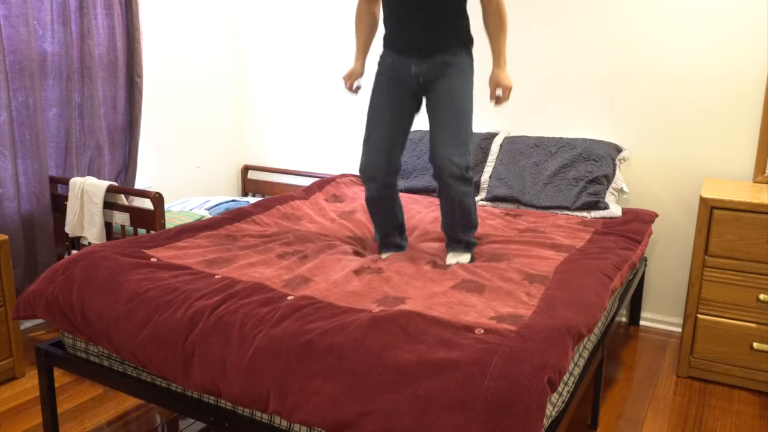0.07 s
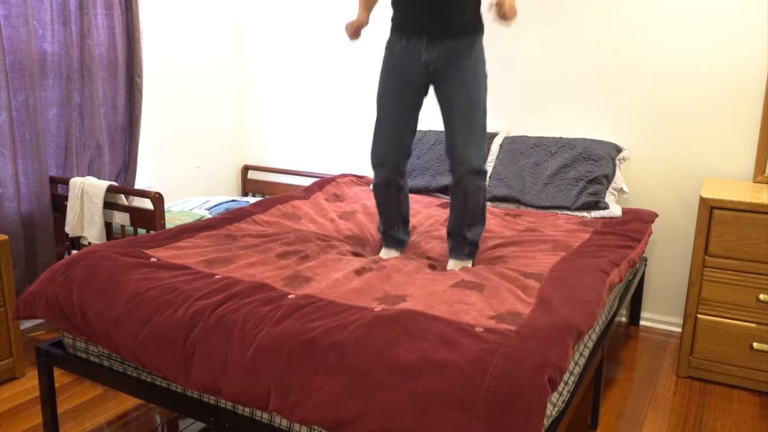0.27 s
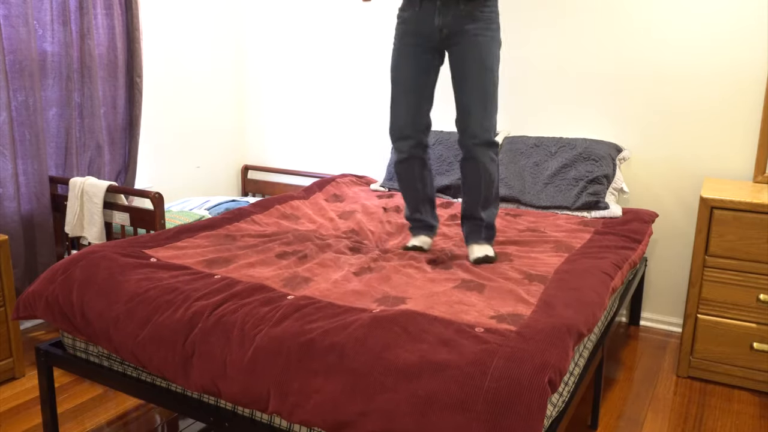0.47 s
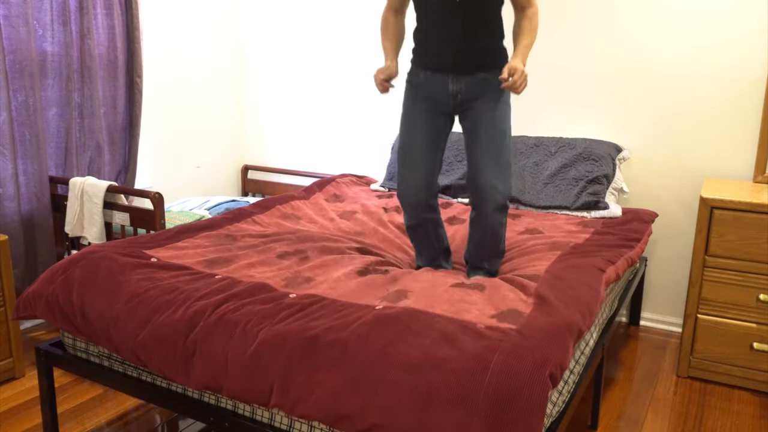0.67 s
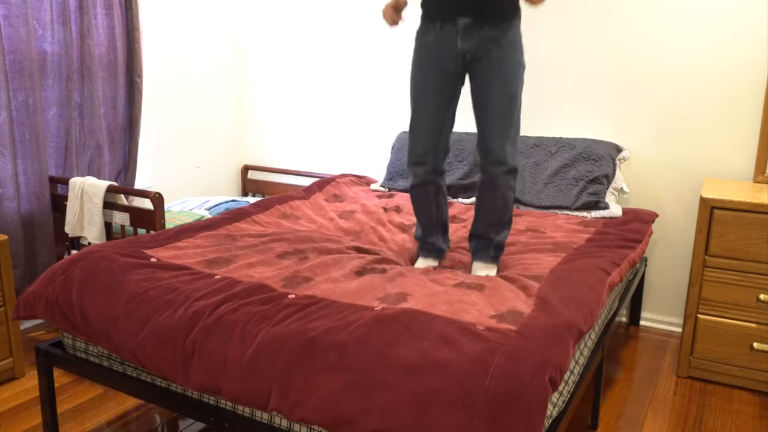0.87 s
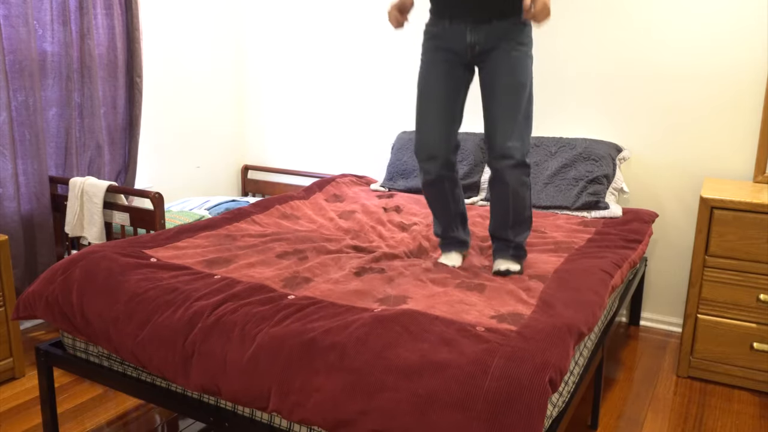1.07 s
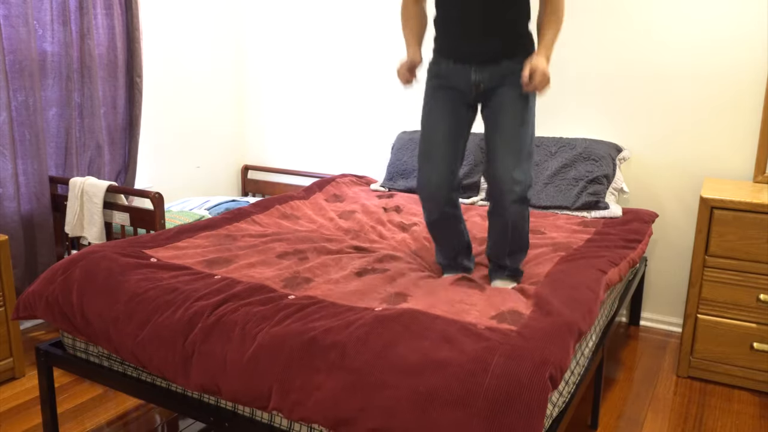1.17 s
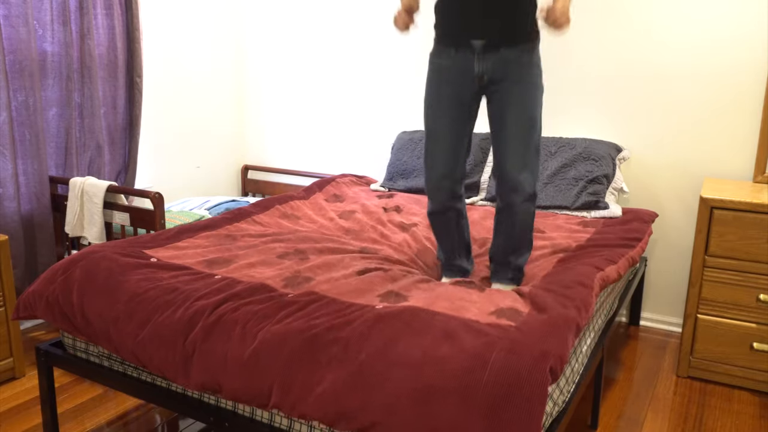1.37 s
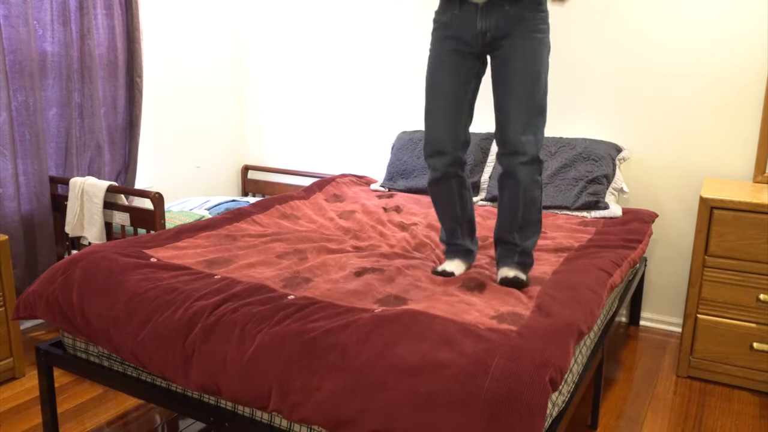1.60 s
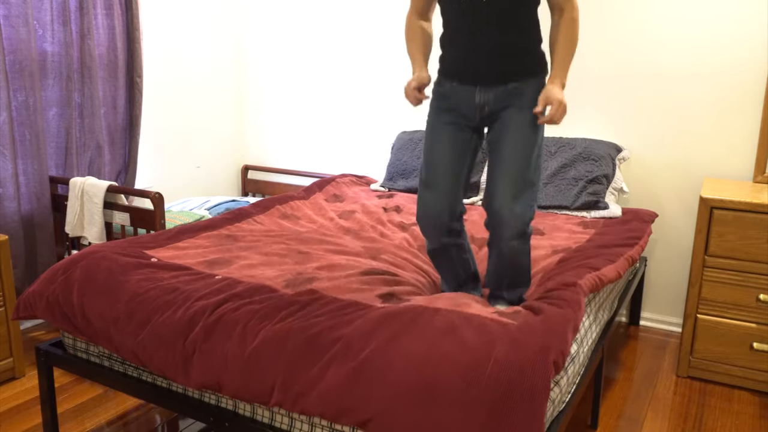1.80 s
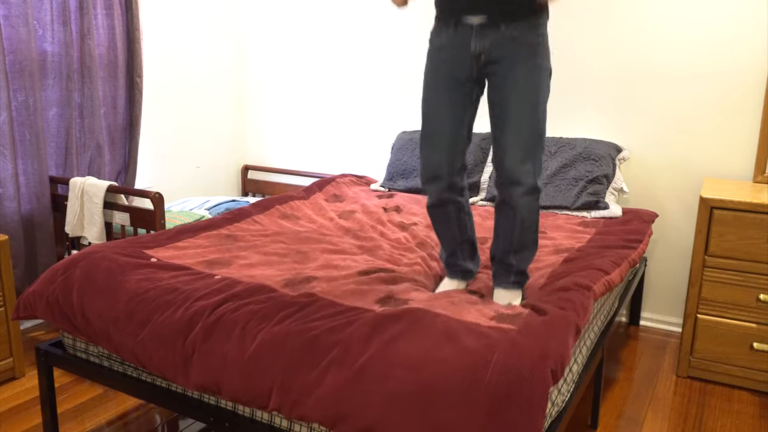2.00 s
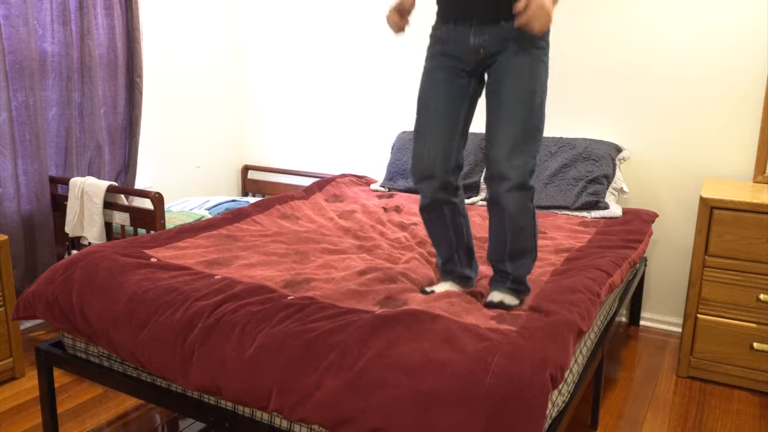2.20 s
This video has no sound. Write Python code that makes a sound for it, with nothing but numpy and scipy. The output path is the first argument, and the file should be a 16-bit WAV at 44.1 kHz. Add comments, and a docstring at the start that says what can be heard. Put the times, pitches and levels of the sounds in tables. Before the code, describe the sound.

A metal bed frame gives one loud, chattering knock at about 0.25 seconds, ringing for under half a second in a small bedroom. Much quieter bounces follow: a soft landing near 0.8 seconds, then deeper mattress thumps at about 1.4 and 1.95 seconds with light sock scuffs. Springs hum faintly near 0.7 and 1.8 seconds. Quilt and jeans rustle throughout over a low rumble and faint room hiss.

```python
"""A metal bed frame gives one loud, chattering knock as someone starts bouncing on the bed.
The first landing makes a joint slip, and the frame rings through a small wooden-floored bedroom.
Later bounces bring soft landings, a hum of springs, deep thumps and a rustle of quilt and jeans.
Loaded joints groan, socks scuff the quilt, and the swaying mattress rumbles over a faint room hiss."""
import sys
import numpy as np
from scipy.fft import rfft, irfft, next_fast_len
from scipy.io import wavfile
from scipy.ndimage import map_coordinates

SR = 44100
rng = np.random.default_rng(int(sys.argv[2]) if len(sys.argv) > 2 else 0)


def pcm_store(signal):
    """Save signal as 16-bit PCM."""
    levels = np.round(np.clip(np.atleast_2d(signal), -1, 1) * 32767)
    wavfile.write(sys.argv[1], SR, levels.astype(np.int16).T)


N = 99225

# The tone of each noisy sound. Each row: frequency in Hz, relative level in dB.
HISS_TONE = [(60, -12), (150, -7), (300, -5), (600, -8), (1200, -14), (1800, -11), (3000, -16), (8000, -21),
             (12000, -21.5)]
RUMBLE_TONE = [(15, -13), (30, -11.5), (48, 2), (70, -4), (105, -8), (150, -14), (220, -26), (500, -47)]
LANDING_TONE = [(30, -4), (60, 1), (150, 0), (245, -3), (380, -10), (550, -16), (900, -21.5), (2500, -34),
                (12000, -52)]
THUMP_TONE = [(25, -14), (50, -5), (90, -2), (150, 1), (220, -12.5), (380, -11.5), (600, -22), (1200, -32),
              (5000, -60)]
GROAN_TONE = [(60, -12), (200, -0.5), (300, -3.5), (400, -2), (540, -1.5), (720, -7.5), (1000, -21),
              (2000, -19), (3000, -34), (10000, -53)]
SWISH_TONE = [(60, -34), (150, 21.5), (210, 9.5), (320, 3.5), (500, 3.5), (1000, -0.5), (1900, -1.5),
              (3000, -4), (6000, -8), (10000, -11.5), (12000, -11.5)]
QUILT_TONE = [(260, -22), (450, -3), (919, -5.5), (1110, -2), (1280, -15), (1680, -1), (2840, -11),
              (5120, -12.5), (8400, -20.5), (9120, -16.5), (12000, -25.5), (15600, -58), (22000, -120)]
SCUFF_TONE = [(200, 3), (700, 0), (2000, -14), (3200, 9), (6000, -20), (9000, 1), (10500, -9)]
KNOCK_TONE = [(60, -20), (125, -3), (180, -7), (250, -14.5), (295, -9.5), (370, -14.5), (500, -1),
              (620, -9.5), (790, -15.5), (1020, -4), (1400, -9.5), (1750, -3.5), (2100, -4.5),
              (2450, -10.5), (3600, -13.5), (5600, -15.5), (6400, -24.5), (8500, -29.5), (11000, -31),
              (12000, -34)]
# Stereo width of the soft noises, and of the struck frame.
# Each row: frequency in Hz, level of the side signal against the middle in dB.
SOFT_WIDTH = [(60, -70), (110, -75), (200, -26.5), (360, -15), (640, -11.5), (1160, -8), (2100, -15.5),
              (3800, -10), (7000, -7), (12000, -9.5)]
FRAME_WIDTH = [(100, -60), (200, -43), (360, -31), (640, -18), (1160, -12), (2100, -14), (3800, -10),
               (7000, -5), (12000, -6)]
# The mattress swaying. Each row: time in seconds, relative rumble level in dB.
SWAY_LEVELS = [(0, -47.5), (.2, -39.5), (.3, -44), (.45, -46.5), (.68, -45.5), (.83, -40), (.92, -51.5),
               (1, -40.5), (1.16, -43.5), (1.22, -39), (1.47, -40.5), (1.68, -46), (1.82, -44), (2.25, -40)]
# Feet meeting or leaving the mattress, joints groaning, and fabric brushing.
# Each row: peak time in seconds, level in dB, rise in seconds, fall in seconds.
LANDINGS = [(0.159, -46.5, 0.055, .03), (.73, -45, 0.038, .05), (.805, -42, .015, 0.045),
            (1.0, -48.5, 0.023, 0.038), (1.228, -41.5, 0.035, 0.043), (1.54, -45.5, 0.013, 0.021),
            (1.595, -46.5, 0.011, 0.015), (1.8, -44.5, 0.07, 0.06)]
GROANS = [(.17, -50, 0.046, 0.075), (0.2265, -35.5, 0.0023, 0.034), (1.899, -41.5, 0.0046, 0.018),
          (1.95, -38, 0.0056, .02)]
SWISHES = [(.21, -46.5, 0.017, 0.15), (.93, -48.5, 0.062, 0.062), (1.019, -51, 0.014, 0.047),
           (1.27, -50.5, 0.079, 0.13), (1.535, -46, 0.051, 0.12), (1.84, -50, 0.031, 0.063),
           (2.05, -50.5, 0.035, 0.12), (2.189, -52, 0.073, 0.054)]
# The bottom of each bounce.
# Each row: peak time in seconds, thump level in dB, rustle level in dB, rise and fall in seconds.
BOUNCES = [(0.819, -43, -45.5, 0.047, 0.04), (1.378, -34.5, -42, 0.037, 0.045),
           (1.948, -34.5, -40.5, 0.036, 0.044)]
# Socks scuffing, and metal contacts in the knock. Each row: start in seconds, relative level in dB.
SCUFFS = [(1.346, -41), (1.893, -48.5)]
CONTACTS = [(0.2458, -19.5), (0.2486, -11.5), (0.2512, -13), (0.2546, -16), (0.256, -20), (0.2687, -16),
            (0.2785, -30), (0.2855, -20), (0.2975, -22)]
# The knock dying away in the room. Each row: frequency in Hz, seconds to fade by 60 dB.
ROOM_FADES = [(100, 0.48), (500, 0.47), (1000, 0.45), (1700, .5), (2800, 0.37), (5000, 0.37), (8000, 0.24),
              (12000, 0.25)]
# The frame's ringing notes. Each row: pitch in Hz, relative level in dB, seconds to fade by 60 dB.
FRAME_NOTES = [(151, -22, .38), (292, -26, .37), (450, -32, .4), (504, -24, .36), (522, -30, .25),
               (549, -31, .38), (958, -28, .34), (1023, -26, .32), (1075, -32, .36), (1234, -35, .45),
               (1556, -34, .44), (1602, -31, .53), (1699, -32, .48), (1775, -30, .43), (1835, -28, .42),
               (1975, -22, .33), (2018, -30, .33), (2106, -28, .35), (2147, -22, .34), (2176, -28, .33),
               (2338, -32, .34), (2933, -35, .3), (3334, -38, .33), (3781, -37, .33), (5648, -40, .33)]
# Springs under load. Each row: peak time in seconds, level in dB, pitch in Hz.
SPRING_HUMS = [(.72, -43, 283.3), (1.801, -40, 290.4)]
# The notes in one hum. Each row: multiple of the pitch, added level in dB.
SPRING_NOTES = [(0.999, -1), (1.13, -13), (1.388, -14.5)]
# Deep pushes on the bed base. Each row: start in seconds, level in dB, pitch in Hz.
PUSHES = [(1.197, -38, 55.4), (1.364, -26, 89), (1.944, -21, 89)]


def amp(db):
    """Turn decibels into a gain."""
    return 10 ** (np.asarray(db) / 20)


def unit(x):
    """Scale a signal to an average (rms) level of 1."""
    return x / np.sqrt(np.mean(x ** 2) + 1e-20)


def along(points, hz):
    """Read between a table's rows on a logarithmic frequency scale."""
    frequencies, values = np.transpose(points)
    return np.interp(np.log(hz + 1), np.log(frequencies + 1), values)


def since(start):
    """Seconds since start, for every sample."""
    return np.arange(N) / SR - start


def wobble(rate):
    """A smooth curve through `rate` random points a second."""
    points = rng.standard_normal(int(N * rate / SR) + 4)
    return map_coordinates(points, [np.arange(N) * rate / SR])


def filtered(x, response):
    """Give each frequency in x the gain that response(hz) asks for."""
    size = next_fast_len(N + SR // 4)
    gains = response(np.fft.rfftfreq(size, 1 / SR))
    return irfft(rfft(x, size) * gains, size)[..., :N]


def stereo(pair, tone, width):
    """Shape two unrelated signals into a middle and a side, then mix left and right."""
    mid, side = filtered(pair, lambda hz: amp([along(tone, hz), along(tone, hz) + along(width, hz)]))
    return np.array([mid + side, mid - side])


def noise(tone, grain_db=0):
    """Stereo noise with its bass in the middle; grain_db makes it grainy."""
    white = rng.standard_normal((2, N)) * amp(grain_db * wobble(rate=400))
    return unit(stereo(white, tone, SOFT_WIDTH))


def swell(peak, db, rise, fall):
    """A level that rises to a rounded top and falls again."""
    t = since(peak)
    distance = np.where(t < 0, t / rise, t / fall)
    return amp(db) * np.exp(.5 - np.hypot(.5, distance))


def build_up(start, rise):
    """A level that climbs from 0 towards 1."""
    return 1 - np.exp(-np.maximum(since(start), 0) / rise)


def decay(start, fade):
    """A level that jumps to 1, then drops 60 dB every `fade` seconds."""
    t = since(start)
    return (t >= 0) * amp(-60 * np.maximum(t, 0) / fade)


def room_hiss(db=-55.5):
    """The faint, steady background of the room."""
    return amp(db) * noise(HISS_TONE)


def mattress(sway_db=-1.5):
    """The mattress rumbles as it sways, thuds underfoot and thumps at the bottom of each bounce."""
    sway = amp(sway_db + np.interp(since(0), *np.transpose(SWAY_LEVELS)))
    landings = sum(swell(*row) for row in LANDINGS)
    thumps = sum(swell(peak, db, rise, fall) for peak, db, _, rise, fall in BOUNCES)
    return sway * noise(RUMBLE_TONE) + landings * noise(LANDING_TONE) + thumps * noise(THUMP_TONE)


def frame_groan():
    """Loaded joints rub with a low, grainy groan."""
    return sum(swell(*row) for row in GROANS) * noise(GROAN_TONE, grain_db=1)


def cloth(flutter_db=0.97):
    """Jeans and quilt brush between bounces; the quilt crumples and socks scuff it."""
    swishes = sum(swell(*row) for row in SWISHES) * noise(SWISH_TONE, grain_db=0.7)
    crumple_level = sum(swell(peak, db, rise, fall) for peak, _, db, rise, fall in BOUNCES)
    crumples = crumple_level * noise(QUILT_TONE, grain_db=1.0)
    scuff_level = sum(amp(db) * decay(start, fade=0.19) for start, db in SCUFFS)
    scuffs = scuff_level * noise(SCUFF_TONE, grain_db=2.0)
    return (swishes + crumples + scuffs) * amp(flutter_db * wobble(rate=44.46))


def metal_peaks(hz, spacing_hz=18, height_db=3.3, full_height_hz=3500):
    """Gains for the metal's many small resonances: random narrow peaks, gentler in the bass."""
    points = rng.standard_normal(int(SR / 2 / spacing_hz) + 2)
    peaks = map_coordinates(points, [hz / spacing_hz])
    return amp(height_db * peaks * np.minimum(hz / full_height_hz, 1))


def contact_burst(fade):
    """The combined level of the knock's contacts, whose energies add up."""
    return np.sqrt(sum((amp(db) * decay(start, fade)) ** 2 for start, db in CONTACTS))


def frame_knock(crack_db=0.5, room_db=-9.5):
    """A joint slips in a burst of cracks, and their ring dies away band by band in the room."""
    white = rng.standard_normal((2, N))
    metal = unit(filtered(rng.standard_normal((2, N)), metal_peaks))
    centres, fades = np.transpose(ROOM_FADES)
    tail = 0
    for share, fade in zip(np.eye(len(ROOM_FADES)), fades):  # share picks out one band
        band = filtered(metal, lambda hz: along(np.c_[centres, share], hz))
        tail = tail + contact_burst(fade) * band
    cracks = contact_burst(fade=0.0064) * white
    hit = amp(crack_db) * cracks + amp(room_db) * tail
    tone_gain = np.std(stereo(white, KNOCK_TONE, FRAME_WIDTH))
    return stereo(hit, KNOCK_TONE, FRAME_WIDTH) / tone_gain


def frame_ring(start=.247, rise=0.0085, gain_db=0.5, shake_db=9.5, waver_radians=0.26):
    """The rails' strong notes build up in the knock and ring on; each bounce stirs them faintly."""
    t = np.maximum(since(start), 0)
    shake = sum(amp(rustle_db + shake_db) * build_up(bottom, rise) * decay(bottom, fade=0.35)
                for bottom, _, rustle_db, _, _ in BOUNCES)
    out = 0
    for hz, db, fade in FRAME_NOTES:
        # Nudging left and right opposite ways widens the note.
        spread = amp(along(FRAME_WIDTH, hz)) * wobble(rate=19) * np.array([[1], [-1]])
        phase = 2 * np.pi * (hz * t + rng.random()) + waver_radians * wobble(rate=45.6)
        level = build_up(start, rise) * decay(start, fade) + shake
        out = out + amp(db) * level * np.sin(phase + spread)
    return amp(gain_db) * out


def springs(waver_radians=0.6):
    """The springs hum briefly and unsteadily as the weight comes down."""
    out = 0
    for peak, db, hz in SPRING_HUMS:
        for multiple, note_db in SPRING_NOTES:
            phase = 2 * np.pi * hz * multiple * since(peak) + waver_radians * wobble(rate=40.14)
            out = out + swell(peak, db + note_db, rise=0.045, fall=0.051) * np.sin(phase)
    return out


def bed_base():
    """The heaviest loads push the base into a few deep swings that soon die out."""
    out = 0
    for start, db, hz in PUSHES:
        level = amp(db) * build_up(start, rise=0.0027) * decay(start, fade=0.13)
        out = out + level * np.sin(2 * np.pi * hz * since(start))
    return out


def scene():
    """All the sounds of the bed, over the room's hiss."""
    frame = frame_knock() + frame_ring() + frame_groan()
    return frame + mattress() + bed_base() + springs() + cloth() + room_hiss()


def record(dry):
    """Cut away the very highest treble."""
    top_hz, slope_width_hz = 12000, 200
    return filtered(dry, lambda hz: np.clip((top_hz - hz) / slope_width_hz + .5, 0, 1))


dry = scene()
out = record(dry)
pcm_store(out)
```